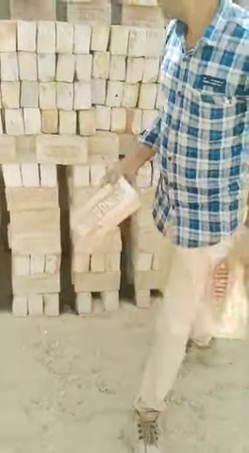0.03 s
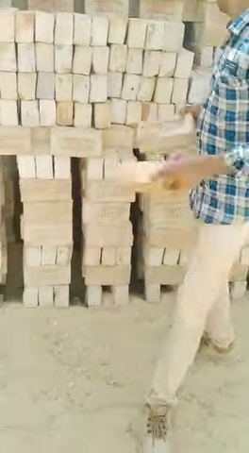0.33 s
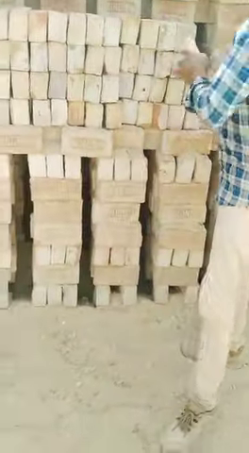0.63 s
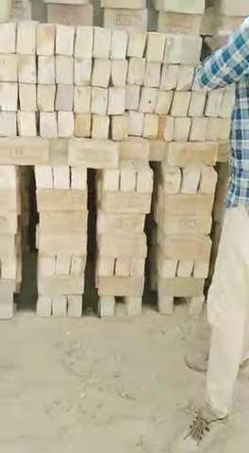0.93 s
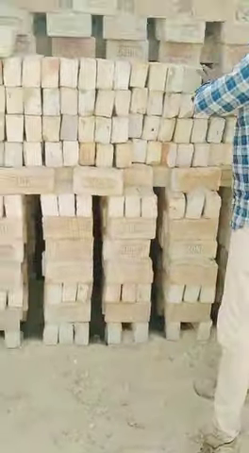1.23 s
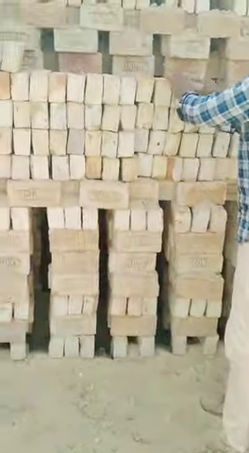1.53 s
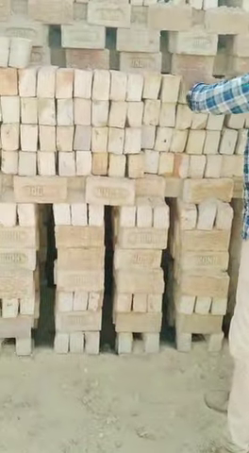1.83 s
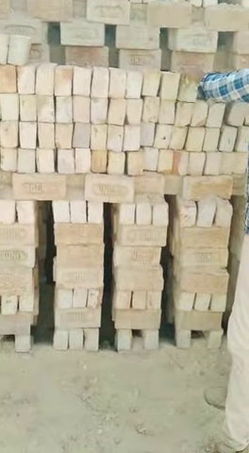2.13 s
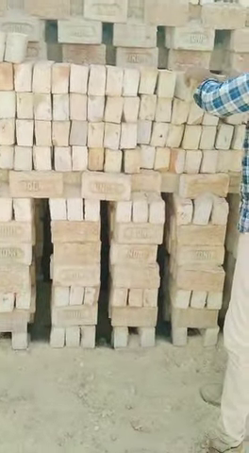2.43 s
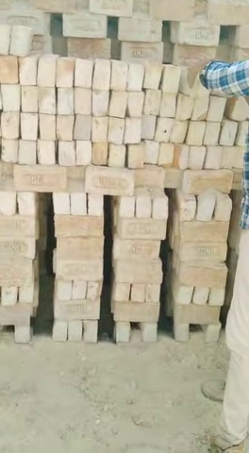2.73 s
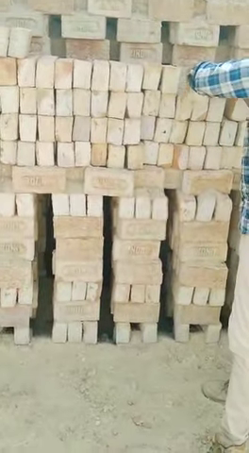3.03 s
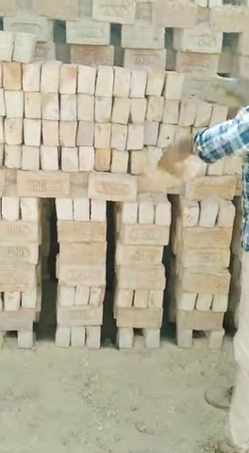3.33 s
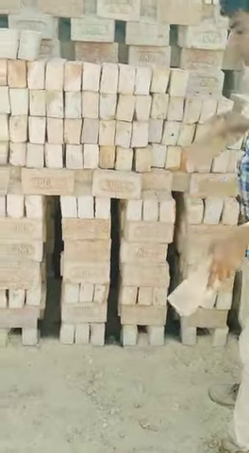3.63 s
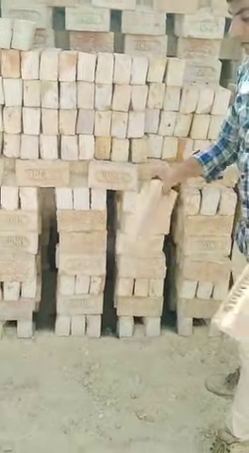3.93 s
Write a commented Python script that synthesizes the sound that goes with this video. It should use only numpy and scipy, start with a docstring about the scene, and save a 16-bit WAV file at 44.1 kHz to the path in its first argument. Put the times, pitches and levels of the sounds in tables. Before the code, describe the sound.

A brick lands on a stack with a thud and a ringing clink. Bricks then scrape over each other in several gritty strokes, ending with another clink. Outdoors, gusts of wind increasingly buffet the microphone.

```python
"""Fired bricks are stacked outdoors. First, clothes swish over a faint hush. At about 1 s a brick lands:
a corner pings, the stack thuds and the brick rings with a clattering clink. Then bricks slide over each
other in five strokes, cracking grit, ringing and briefly squealing. Gusts of wind buffet the microphone
more and more. Near 3.4 s the last brick clinks as it slips off an edge, and a sleeve rustles as the arm
comes down, with a few tiny tinkles."""
import sys
import numpy as np
from scipy import signal
from scipy.fft import rfft, irfft
from scipy.io import wavfile
from scipy.ndimage import uniform_filter1d

SR = 44100
rng = np.random.default_rng(int(sys.argv[2]) if len(sys.argv) > 2 else 0)


def waveform_to_disk(signal):
    """Save audio, clipped to [-1, 1], as 16-bit WAV at the path in sys.argv[1]."""
    frames = np.transpose(np.atleast_2d(signal))
    scaled = np.clip(frames, -1, 1) * 32767
    samples = np.round(scaled).astype(np.int16)
    wavfile.write(sys.argv[1], SR, samples)


N = 176400  # 4 seconds
CONTACT_S, TOP_HZ = .002, 15750  # how long a touch takes; the top of the treble
JUDDER_PER_S, JUDDER_DB, WAVERS_PER_S = 64, 2, 220  # how rubbing shakes the level and the pitch

# Brick hitting brick. Each row: start in seconds, relative thud, ring and crunch levels in dB, brick.
KNOCKS = [ (0.919, -36.5, -50.5, -48.5, "landing"), (0.968, -30, -39.5, -39, "landing"),
          (.977, -15.5, -25.5, -32, "landing"), (.996, -12, -19, -37, "landing"),
          (1.005, -22.5, -20.5, -40, "landing"), (1.016, -32, -24.5, -54, "landing"),
          (1.102, -45, -63, -35.5, "landing"), (1.122, -41.5, -62, -65, "landing"),
          (1.219, -41.5, -60, -56, "landing"), (1.29, -37.5, -65, -52, "landing"),
          (1.769, -24, -55, -48, "landing"), (2.395, -41.5, -60, -66, "pushed"),
          (3.421, -58, -36, -38, "pulled"), (3.431, -54, -32, -60, "pulled"), ]
# The stack's hollow tones. Each row: pitch in Hz, relative level in dB.
STACK_TONES = [(285, -12), (375, -9), (540, -12), (700, -8), (794, -5), (850, -4), (926, -1), (966, 0),
               (1004, -2)]
# The dull noise of a thud. Each row: frequency in Hz, relative level in dB.
THUD_COLOUR = [(40, -3.5), (130, -5.5), (380, -1.5), (700, -2), (1000, -7), (1250, -11.5), (1500, -15),
               (2100, -22), (2900, -18), (4200, -50.5), (16000, -92)]
def knocks(thud_s=.0055, tail_s=.055, stack_ring_s=.068):
    """Each contact thuds in the stack and crushes some grit."""
    hollow, thud_power, crunch_power = np.zeros((3, N))
    for start, thud_db, _, crunch_db, _ in KNOCKS:
        add(hollow, start, amp(thud_db - 6.5) * ring([(hz, db, stack_ring_s) for hz, db in STACK_TONES]))
        shape = burst(start, CONTACT_S, thud_s) + amp(-22) * burst(start, thud_s, tail_s)
        thud_power += (amp(thud_db) * shape) ** 2
        crunch_power += (amp(crunch_db) * burst(start, CONTACT_S, decay_s=.011)) ** 2
    thud = amp(-4) * colour(np.sqrt(thud_power) * noise(), THUD_COLOUR)
    return hollow + thud + gritty(np.sqrt(crunch_power) * grains())


# The tones each brick rings with. Each row: pitch in Hz, relative level in dB.
BRICK_TONES = { "landing": [(1738, -13), (1806, -1), (1902, -4), (2019, -7), (2530, 1), (2632, -5),
               (3640, -20), (3790, -20), (4355, -20), (4883, -24), (5680, -22), (6400, -22)],
               "pushed": [(1760, -14), (2116, -7), (2270, -10), (2424, -4), (2475, -2), (2635, -10),
               (2757, -11), (3037, -9), (3380, -18), (3745, -10), (4230, -14), (4585, -15), (5155, -17),
               (5905, -16), (6164, -16), (6492, -16), (6745, -16), (7477, -7), (8110, -15)],
               "pulled": [(1780, -16), (1857, -12), (1970, -11), (2466, 0), (2627, -9), (2757, -2),
               (3720, -10), (4235, -14), (4657, -18), (5308, -17), (5910, -12), (6170, -12), (6928, -16),
               (7311, -12), (7612, -5), (10015, -5), (10610, -6), (11230, -8)], }
def clinks(chatter_s=.011, damped_s=.0025, ring_on_db=-9, jostle_hz=45, drift_hz=4):
    """Blows ring a brick. Its chattering faces shake the pitch and soak up energy; the rest rings on."""
    out = np.zeros(N)
    for brick in BRICK_TONES:
        tones, blows = brick_tones(brick), np.zeros(N)
        for start, _, ring_db, _, struck in KNOCKS:
            blows[int(start * SR)] += (struck == brick) * amp(ring_db) ** 2
        chatter = np.sqrt(fade(blows, chatter_s) / fade(blows, 10 * chatter_s))
        blows = uniform_filter1d(blows, int(CONTACT_S * SR) + 2).clip(0)
        total_power = sum(amp(db) ** 2 for _, db, _ in tones) / 2
        for hz, db, ring_s in tones:
            pitch = hz + (jostle_hz * chatter + drift_hz) * wander(WAVERS_PER_S)
            energy = fade(blows, damped_s) + amp(ring_on_db) ** 2 * fade(blows, ring_s / np.log(1000))
            out += amp(db) * np.sqrt(energy / total_power) * sine(pitch)
    return out


def brick_tones(brick):
    """Give each tone a ring time: high ones die sooner, strong ones are damped least by the support."""
    hz, db = np.array(BRICK_TONES[brick], float).T
    ring_s = .34 * (2000 / hz) ** .45 * 2 ** (db / 24)
    return np.column_stack([hz, db, ring_s])


# The ping of a corner. Each row: pitch in Hz, relative level in dB.
CORNER_TONES = [(2525, -7), (3774, -1), (5669, -9), (6401, 0)]
def corner(start_s=.917, ring_s=.09):
    """A corner touches first, so lightly that only a few high tones ring."""
    out = np.zeros(N)
    add(out, start_s, amp(-48) * ring([(hz, db, ring_s) for hz, db in CORNER_TONES]))
    return out


# Sliding strokes. Each row: brick, then points of time in seconds, grit level in dB, ring level in dB.
STROKES = [ ("landing", [(.97, -36.5, -68), (1.04, -49.5, -60), (1.11, -49.5, -43), (1.2, -62.5, -64),
           (1.26, -62, -59.5), (1.3, -51.5, -52.5), (1.38, -68, -62), (1.46, -62, -76)]),
           ("landing", [(1.44, -63, -78), (1.56, -58, -60), (1.63, -57, -56), (1.71, -48.5, -58),
           (1.75, -55.5, -58.5), (1.84, -50, -57), (1.92, -63.5, -69), (2.03, -78, -93)]),
           ("pushed", [(2.10, -72, -95), (2.14, -46, -46.5), (2.24, -49, -51.5), (2.29, -48.5, -44),
           (2.35, -57, -70), (2.39, -50, -51), (2.44, -54, -59.5), (2.55, -72, -71.5)]),
           ("pushed", [(2.72, -66, -66), (2.77, -58.5, -59.5), (2.82, -51.5, -51.5), (2.9, -49.5, -46.5),
           (2.97, -46.5, -49), (3.02, -45.5, -44.5), (3.045, -98, -100)]), ("pulled", [(3.08, -78, -58.5),
           (3.14, -58.5, -65), (3.18, -53.5, -41), (3.21, -43, -53), (3.235, -48, -52.5),
           (3.26, -46, -42.5), (3.33, -46, -46.5), (3.38, -50, -47), (3.405, -87, -73)]), ]
def scrapes(groups=6, shifts_per_s=30, shift_db=3.5):
    """Grit hisses under a sliding brick and keeps it ringing, favouring now some tones, now others."""
    out, friction = np.zeros(N), grains()
    for brick, stroke in STROKES:
        out += gritty(friction * curve(stroke, column=1))
        drive = friction * curve(stroke, column=2)
        tones = brick_tones(brick) * [1, 1, .6]  # rubbing shortens the ring
        power = amp(tones[:, 1]) ** 2
        for k in range(groups):
            share = np.sqrt(power[k::groups].sum() / power.sum())
            out += share * resonate(drive * flicker(shifts_per_s, shift_db), ring(tones[k::groups]))
    return out


def grains(per_s=3500, spread_db=3):
    """Dense tiny clicks in uneven spurts, as when sand cracks between two faces."""
    clicks = (rng.random(N) < per_s / SR) * np.sign(noise())
    sizes = amp(spread_db * np.minimum(rng.exponential(size=N), 5))
    return unit(clicks * sizes * flicker(JUDDER_PER_S, JUDDER_DB))


# The hiss of grit. Each row: frequency in Hz, relative level in dB.
GRIT_COLOUR = [(100, -5), (500, -0.5), (950, -5.5), (1450, -15), (1900, 0.5), (2700, 0), (3300, -8.5),
               (3800, -4.5), (4900, -12.5), (6200, -3), (7600, -2.5), (8800, -11.5), (10600, 4.5),
               (13000, -6), (15500, 1.5)]
def gritty(x, count=80, from_hz=3300, ring_s=.11, ring_share=.68):
    """Cracking sand is heard partly direct and partly through the brick's crowd of faint high tones."""
    hz = np.linspace(from_hz, TOP_HZ, count)
    hz += (hz[1] - hz[0]) * (rng.random(count) - .5)
    body = ring([(f, 3 * rng.standard_normal(), ring_s) for f in hz])
    low = signal.sosfilt(signal.butter(2, from_hz, fs=SR, output="sos"), x)
    high = signal.sosfilt(signal.butter(2, from_hz, "high", fs=SR, output="sos"), -x)
    direct = low + np.sqrt(1 - ring_share) * high
    return colour(direct + np.sqrt(ring_share / 2) * resonate(x, body), GRIT_COLOUR)


# Brief squeals. Each row: time of the peak in seconds, half length in seconds, pitch in Hz, level in dB.
SQUEALS = [(1.615, 0.023, 2650, -54.5), (1.689, 0.039, 3043, -50.5), (2.24, 0.037, 2424, -42),
           (2.31, 0.03, 3037, -52), (3.023, 0.017, 3042, -46.5), (3.209, 0.01, 2747, -42),
           (3.343, 0.017, 2462, -43)]
def squeals(waver_hz=16):
    """The brick sticks and slips, so one tone sings and stutters for a moment."""
    out, waver = np.zeros(N), waver_hz * wander(WAVERS_PER_S)
    for peak, half, hz, db in SQUEALS:
        swell = np.exp(-np.minimum(((seconds() - peak) / half) ** 2 / 2, 20))
        out += amp(db) * swell * np.sqrt(2) * sine(hz + waver)
    return out * flicker(JUDDER_PER_S, 2 * JUDDER_DB)


# Single grains breaking. Each row: start in seconds, relative level in dB.
SNAPS = [(1.452, -43), (2.635, -49), (3.422, -29), (3.506, -50)]
def snaps(snap_s=.0016):
    """Lone grains of grit crack with a bright tick."""
    cracks = noise() * sum(amp(db) * burst(start, snap_s / 10, snap_s) for start, db in SNAPS)
    return colour(cracks, [(500, -25), (3000, -35), (6000, 3), (9000, 1), (16000, -7.5)])


def yard(x, echo_db=-24.5, echo_s=.088):
    """Add a short scattered echo from the surrounding stacks."""
    reflections = noise() * burst(.0013, .0021, echo_s / np.log(1000))
    return x + amp(echo_db) * resonate(x, reflections)


# The rise and fall of the wind. Each row: time in seconds, relative strength in dB.
GUSTS = [(0, -57.5), (.23, -56.5), (.29, -72), (.46, -63), (.53, -45), (.63, -47), (.7, -57), (.77, -47),
         (.86, -61), (1.22, -50.5), (1.35, -40), (1.53, -51.5), (1.83, -52), (1.865, -31.5), (2.02, -35.5),
         (2.06, -29), (2.13, -27.5), (2.23, -40.5), (2.4, -42.5), (2.55, -31), (2.61, -34), (2.73, -49.5),
         (2.91, -39), (2.98, -27), (3.12, -27.5), (3.2, -20.5), (3.37, -28), (3.48, -21), (3.58, -26.5),
         (3.76, -28.5), (3.86, -24), (4, -26)]
# Sharp puffs of air. Each row: start in seconds, relative thump and tearing levels in dB.
BUFFETS = [(2.05, -13, -48), (2.071, -42, -29.5), (2.106, -26, -26.5), (2.553, -22, -64), (2.981, -18, -28),
           (3.066, -13, -29), (3.12, -39, -24.5), (3.176, -9.5, -21.5), (3.236, -9.5, -45),
           (3.267, -37, -21.5), (3.459, -7.5, -15), (3.518, -9, -33), (3.621, -43, -17.5),
           (3.788, -16, -31.5), (3.943, -25.5, -44)]
# The wind's three layers, deepest first. Each row: frequency in Hz, relative level in dB.
RUMBLE_COLOUR = [(10, -20), (35, 9), (60, -2), (100, -7.5), (150, -44), (500, -46.5), (16000, -100)]
SWIRL_COLOUR = [(20, -14.5), (62, 4), (110, 5), (200, -6.5), (320, -15), (600, -41.5), (16000, -100)]
TEARING_COLOUR = [(60, -8.5), (220, 11), (550, -3), (1000, -21), (2000, -43), (5000, -47.5), (16000, -52)]
def wind(strong_gust_db=-24.5):
    """Gusts rumble on the microphone; stronger ones break into swirls and rough tearing, with puffs."""
    gust = curve(GUSTS) / amp(strong_gust_db) * flicker(per_s=18, db=2)
    swirl = amp(-25.5) * gust ** 1.534
    tearing = amp(-43) * gust ** 3.1  # grows fastest as the wind rises
    for start, thump_db, tearing_db in BUFFETS:
        puff = 2 * burst(start, rise_s=.0033, decay_s=.0033)
        swirl += amp(thump_db) * puff
        tearing += amp(tearing_db) * puff
    rumble = amp(-30.5) * gust ** .76 * colour(noise(), RUMBLE_COLOUR)
    return rumble + colour(swirl * noise(), SWIRL_COLOUR) + colour(tearing * noise(), TEARING_COLOUR)


# The opening swish, then the closing rustle of sleeve and dust. Each row: time in seconds, level in dB.
SWISH = [(0, -74), (.1, -66), (.28, -72.5), (.36, -60.5), (.44, -59), (.49, -64.5), (.54, -56),
         (.65, -56.5), (.7, -74), (.88, -119)]
SLEEVE = [(3.45, -76), (3.78, -61.5), (4, -68.5)]
# How dull or bright those two are. Each row: frequency in Hz, relative level in dB.
SWISH_COLOUR = [(100, -3.5), (700, 1), (2600, 4.5), (3600, -12.5), (6400, -13.5), (8800, -20), (16000, -25)]
SLEEVE_COLOUR = [(300, -18), (2000, 4.5), (5500, 3.5), (9000, -4.5), (11000, 1), (15500, -12)]
def clothes():
    """Clothes swish as the arm swings up and comes down again."""
    return colour(grains() * curve(SWISH), SWISH_COLOUR) + colour(noise() * curve(SLEEVE), SLEEVE_COLOUR)


# Tiny high tinkles. Each row: start in seconds, level in dB.
TINKLES = [(.028, -55), (3.578, -49.5), (3.856, -55), (3.914, -47.5)]
def tinkles(hz=10800, ring_s=.03):
    """Something small tinkles as the person carrying the bricks moves."""
    out = np.zeros(N)
    for start, db in TINKLES:
        add(out, start, amp(db) * ring([(hz, 0, ring_s)]))
    return out


# The outdoor background. Each row: frequency in Hz, relative level in dB.
HUSH_COLOUR = [(30, 1), (200, 2), (500, -2), (1200, 0.5), (2400, 4.5), (3500, -6.5), (5000, -12),
               (6400, -2.5), (8800, -16), (10500, -5.5), (16000, -13.5)]
def hush(level_db=-68.5):
    """A faint, steady hush comes from far away."""
    return amp(level_db) * colour(noise(), HUSH_COLOUR)


def amp(db):
    """Turn decibels into a gain."""
    return 10 ** (np.asarray(db) / 20)


def unit(x):
    """Scale to an average power of 1."""
    return x / np.sqrt(np.mean(x ** 2))


def seconds():
    """The time of every sample."""
    return np.arange(N) / SR


def curve(rows, column=1):
    """A gain that follows rows of seconds and dB, silent outside them."""
    rows = np.array(rows)
    return amp(np.interp(seconds(), rows[:, 0], rows[:, column], left=-200, right=-200))


def colour(x, points, size=8192):
    """Shape bass and treble along points of Hz and dB; white noise keeps its power."""
    hz, db = np.array(points).T
    grid_hz = np.arange(size // 2 + 1) * SR / size
    gain = unit(amp(np.interp(np.log(grid_hz + 1), np.log(hz), db)))
    cepstrum = irfft(np.log(gain))
    cepstrum[1:size // 2] *= 2  # folded so the filter never sounds ahead of its input
    cepstrum[size // 2 + 1:] = 0
    return signal.fftconvolve(x, irfft(np.exp(rfft(cepstrum))))[:N]


def noise():
    """White noise."""
    return rng.standard_normal(N)


def wander(per_s):
    """A smooth random wobble with a spread of 1."""
    step = max(int(SR / per_s), 2)
    return unit(uniform_filter1d(noise()[np.arange(N) // step], step))


def flicker(per_s, db):
    """A gain that wobbles at random by about db."""
    return unit(amp(db * wander(per_s)))


def sine(hz):
    """A pure tone that follows a changing pitch."""
    return np.sin(2 * np.pi * np.cumsum(hz) / SR)


def burst(start, rise_s, decay_s):
    """A gain that rises quickly and dies away."""
    age = np.maximum(seconds() - start, 0)
    return (1 - np.exp(-age / rise_s)) * np.exp(-np.minimum(age / decay_s, 60))


def fade(power, decay_s):
    """Store incoming energy and let it leak away."""
    return signal.lfilter([1], [1, -np.exp(-2 / (decay_s * SR))], power + 1e-24)


def ring(tones):
    """A body struck at a random spot. Each tone: pitch in Hz, level in dB, seconds to fall 60 dB."""
    t = np.arange(SR // 2) / SR
    hz, db, ring_s = np.array(tones).T[:, :, None]
    waves = np.sin(2 * np.pi * (hz * t + rng.random(hz.shape))) * np.exp(-np.log(1000) * t / ring_s)
    attack = 1 - np.exp(-t / CONTACT_S)
    return attack * (amp(db) * waves).sum(0) / np.sqrt(np.sum(amp(db) ** 2) / 2)


def resonate(x, response):
    """Let x set a body ringing; white noise keeps its power."""
    return signal.oaconvolve(x, response / np.linalg.norm(response))[:N]


def add(out, start, sound):
    """Mix a sound in at a time in seconds."""
    i = int(start * SR)
    out[i:i + len(sound)] += sound[:N - i]


def scene():
    """Bricks in the yard, with tinkles, clothes, wind and a hush, in one channel."""
    bricks = corner() + knocks() + clinks() + scrapes() + squeals() + snaps()
    return (yard(bricks) + tinkles() + clothes() + wind() + hush())[None]


def record(dry):
    """Cut off the highest treble."""
    return signal.sosfilt(signal.ellip(10, .2, 70, TOP_HZ, fs=SR, output="sos"), dry)


dry = scene()
out = record(dry)
waveform_to_disk(out)
```